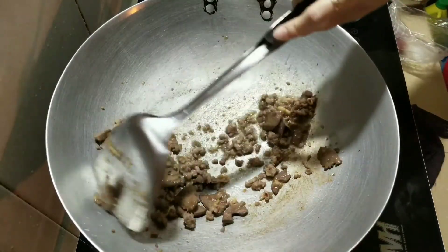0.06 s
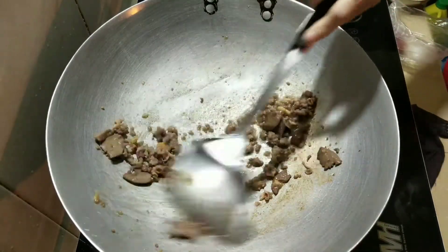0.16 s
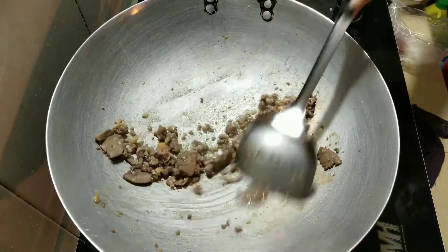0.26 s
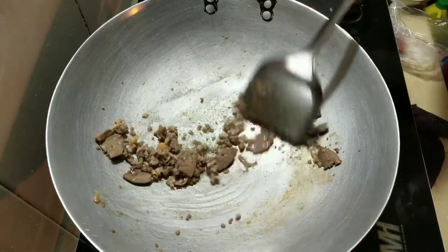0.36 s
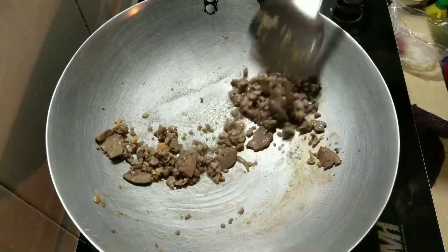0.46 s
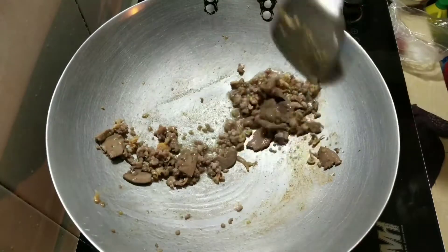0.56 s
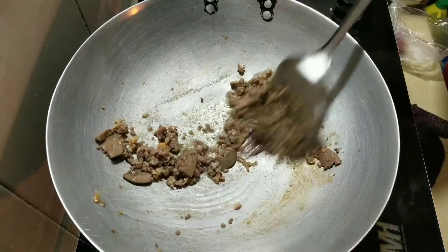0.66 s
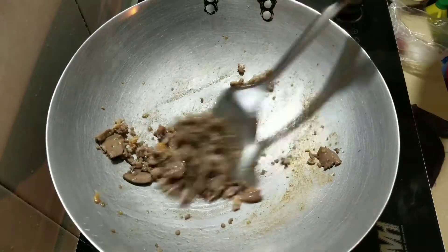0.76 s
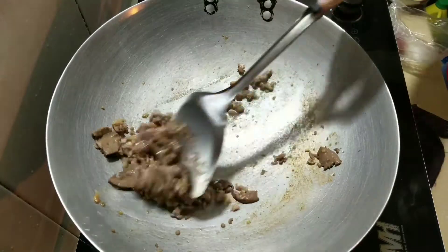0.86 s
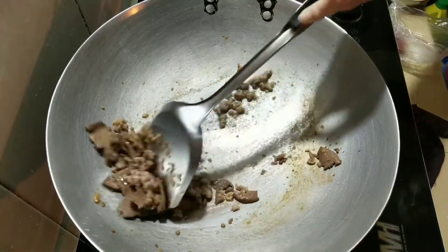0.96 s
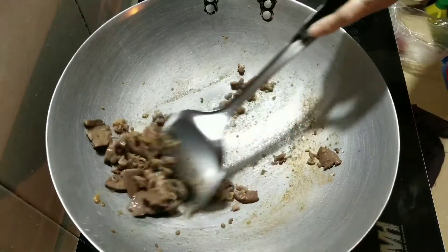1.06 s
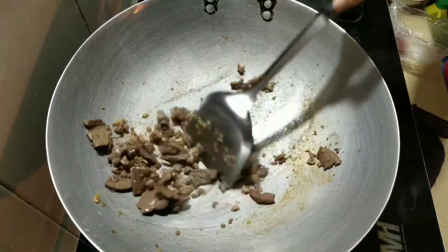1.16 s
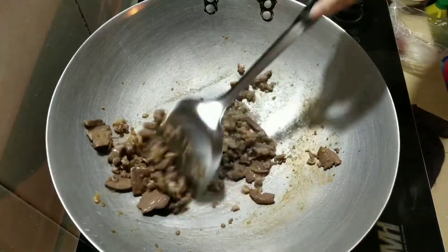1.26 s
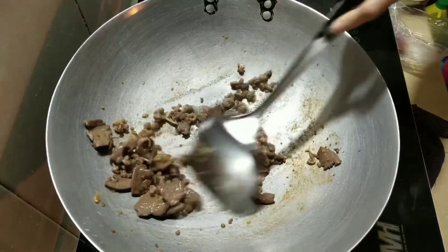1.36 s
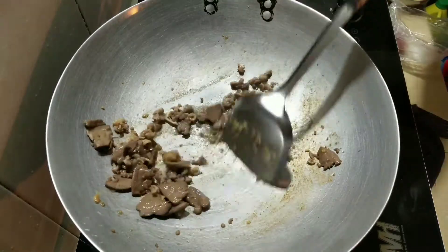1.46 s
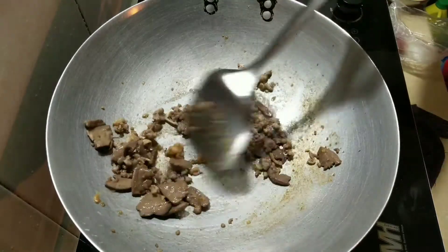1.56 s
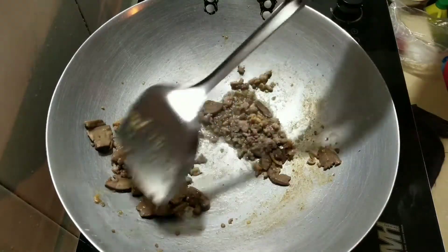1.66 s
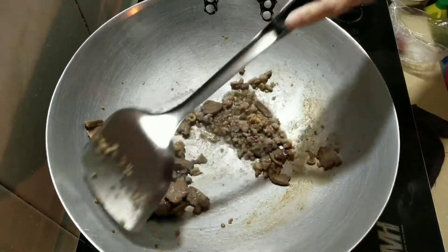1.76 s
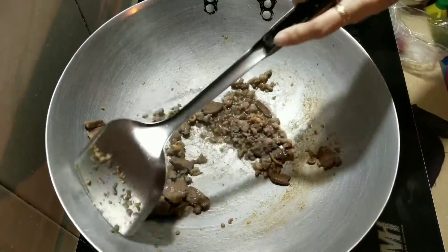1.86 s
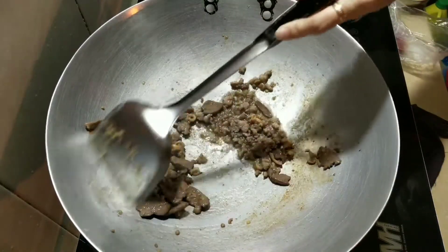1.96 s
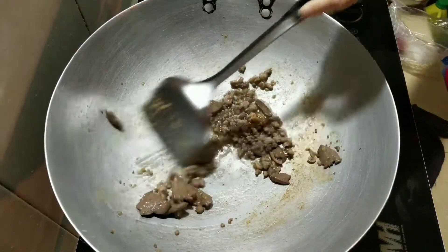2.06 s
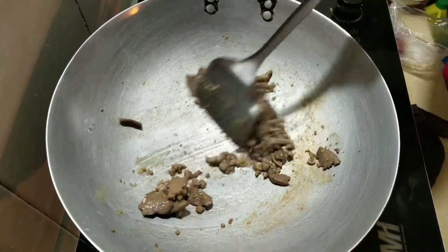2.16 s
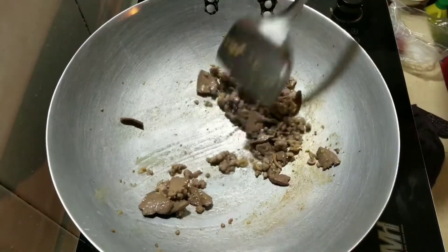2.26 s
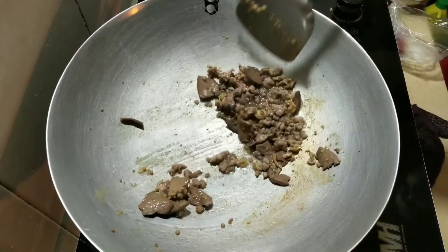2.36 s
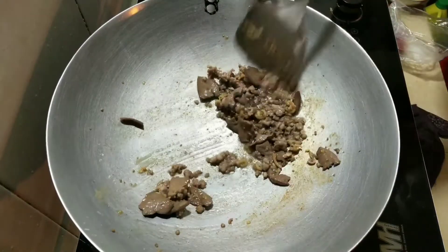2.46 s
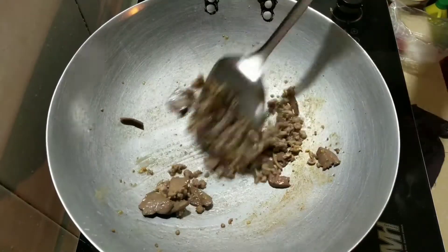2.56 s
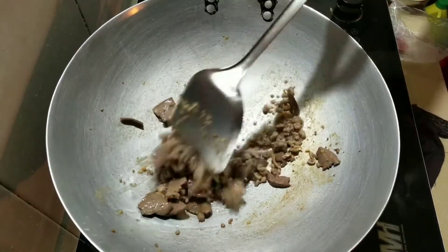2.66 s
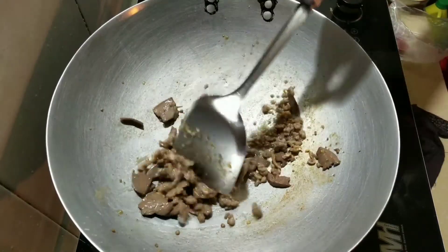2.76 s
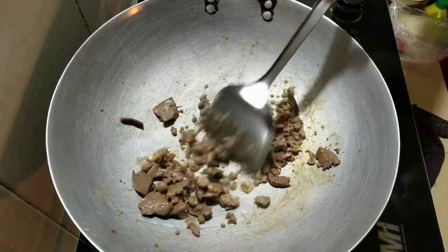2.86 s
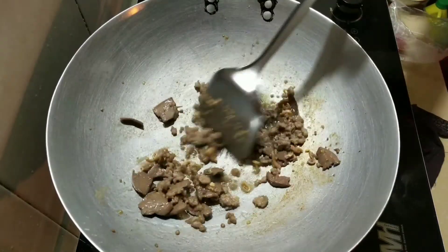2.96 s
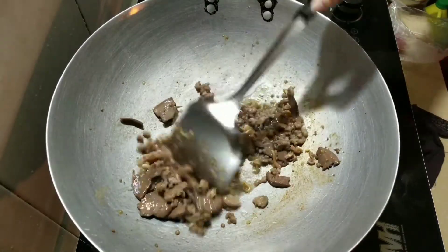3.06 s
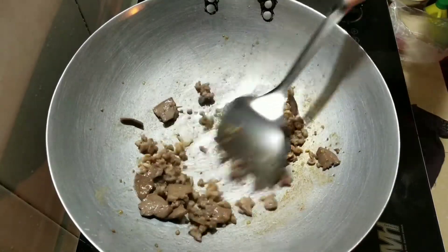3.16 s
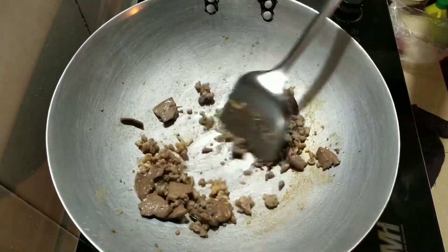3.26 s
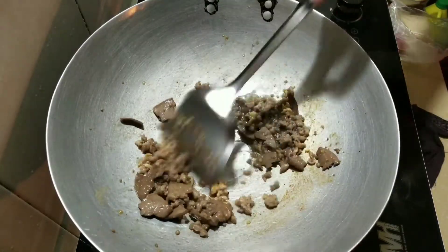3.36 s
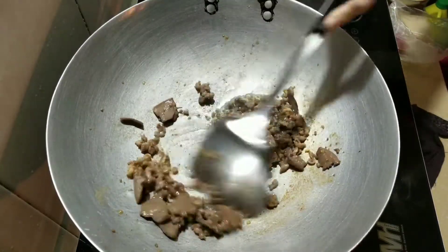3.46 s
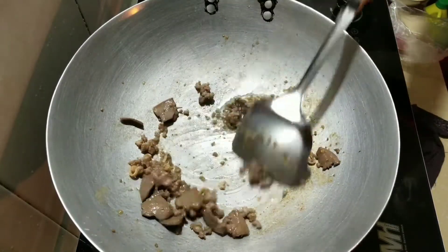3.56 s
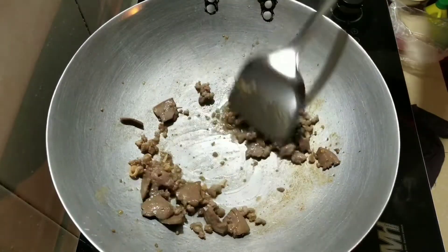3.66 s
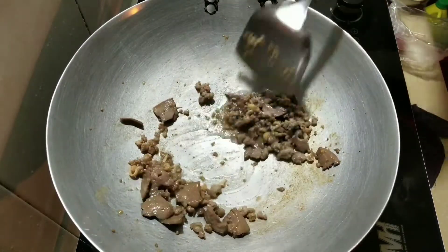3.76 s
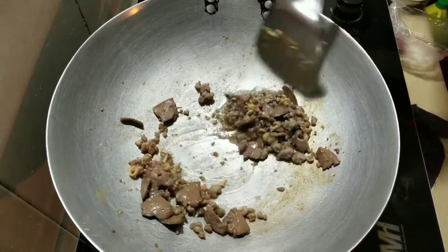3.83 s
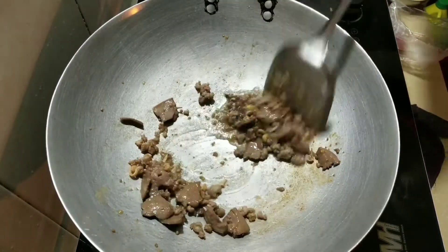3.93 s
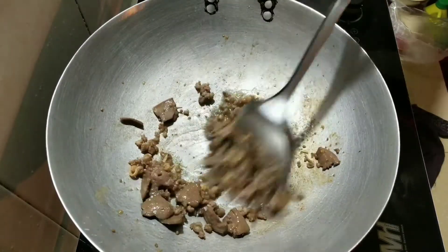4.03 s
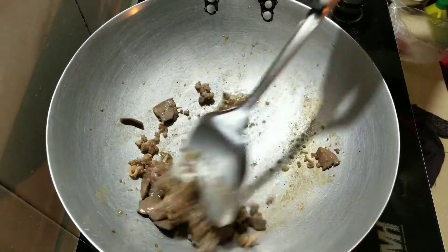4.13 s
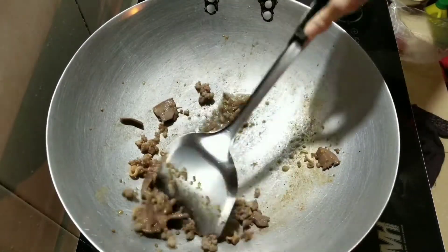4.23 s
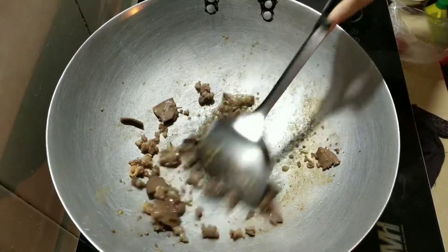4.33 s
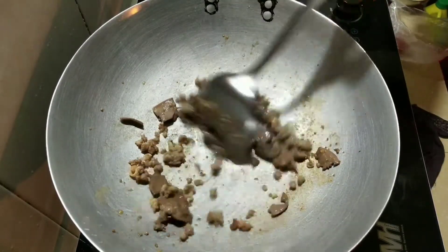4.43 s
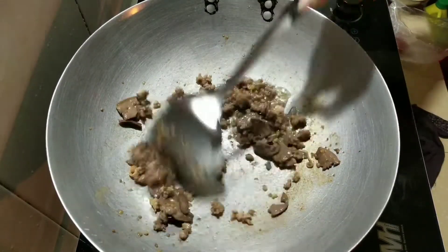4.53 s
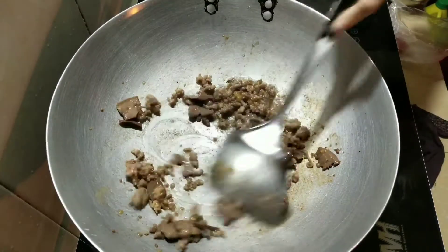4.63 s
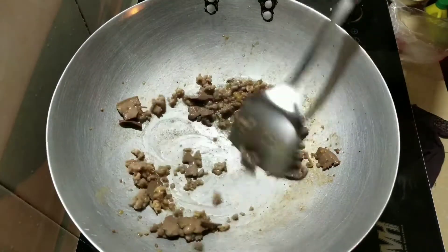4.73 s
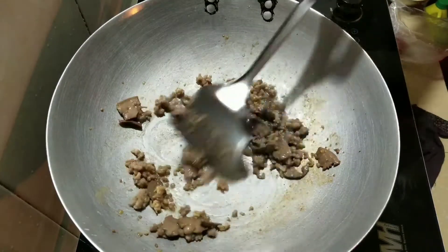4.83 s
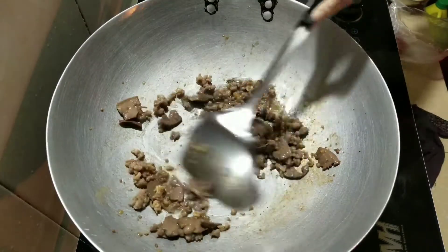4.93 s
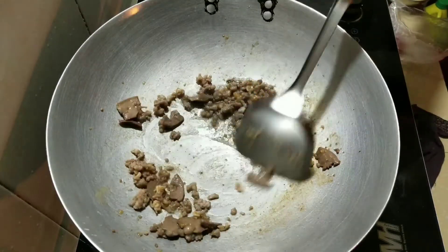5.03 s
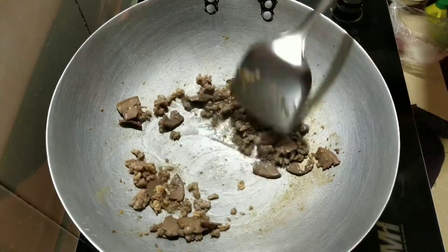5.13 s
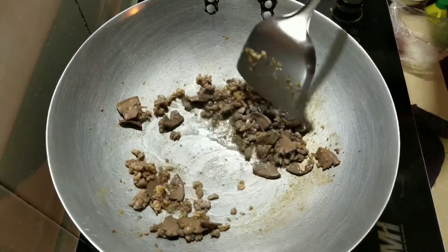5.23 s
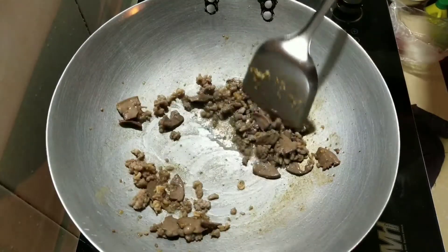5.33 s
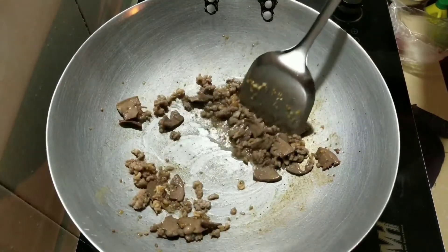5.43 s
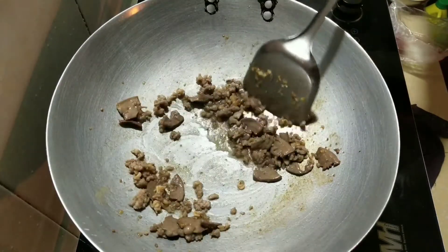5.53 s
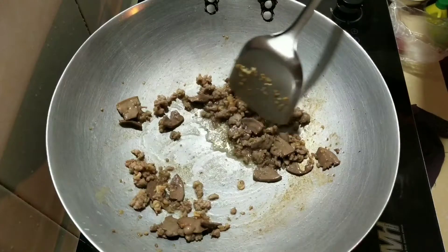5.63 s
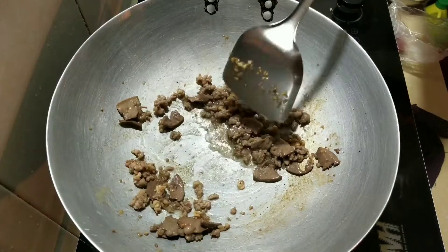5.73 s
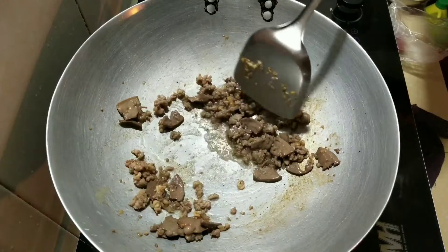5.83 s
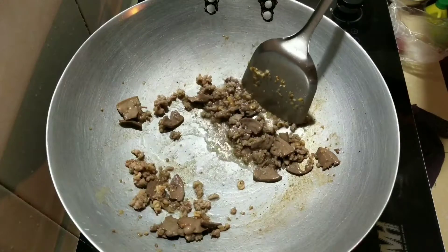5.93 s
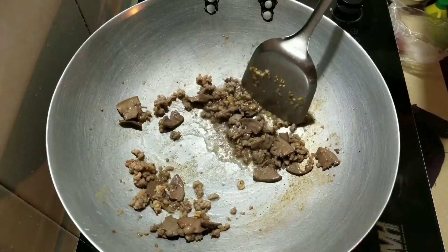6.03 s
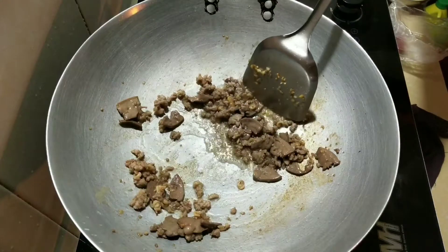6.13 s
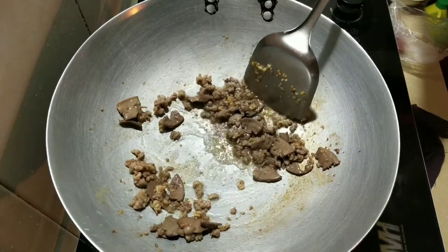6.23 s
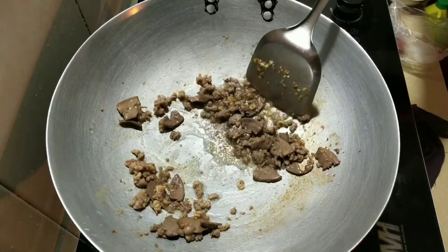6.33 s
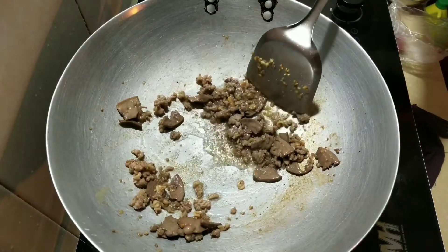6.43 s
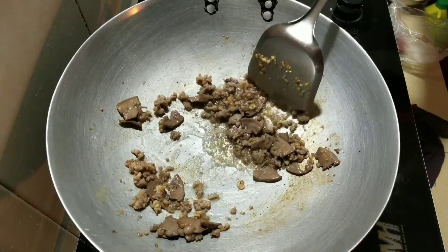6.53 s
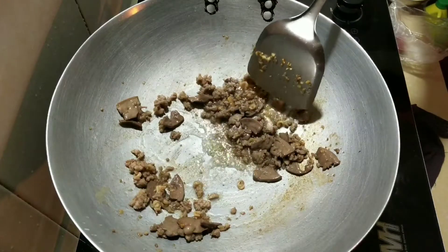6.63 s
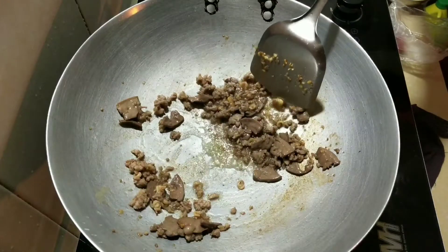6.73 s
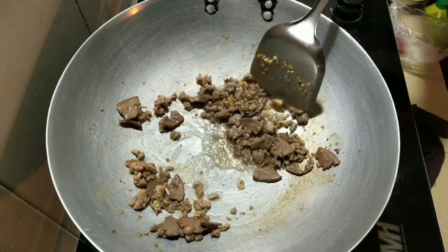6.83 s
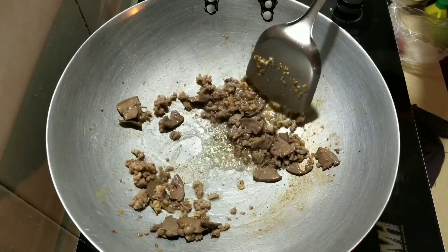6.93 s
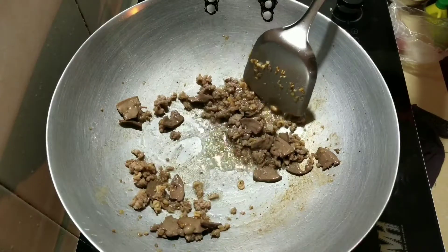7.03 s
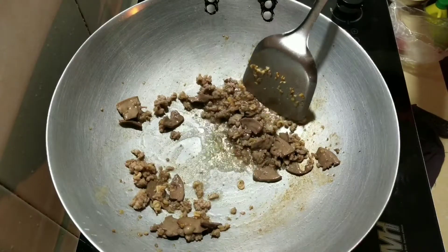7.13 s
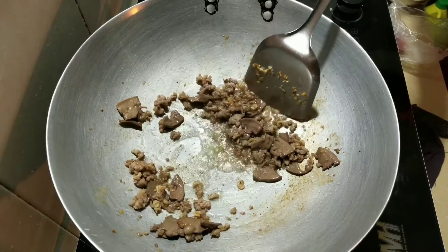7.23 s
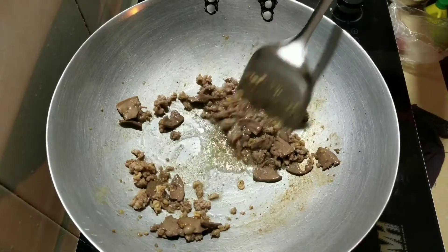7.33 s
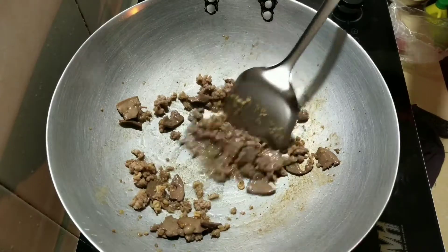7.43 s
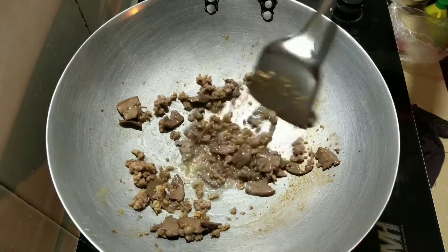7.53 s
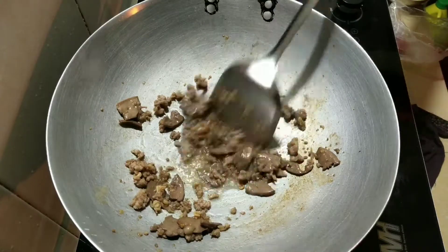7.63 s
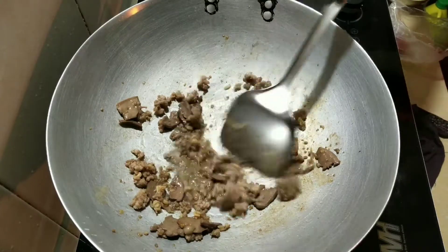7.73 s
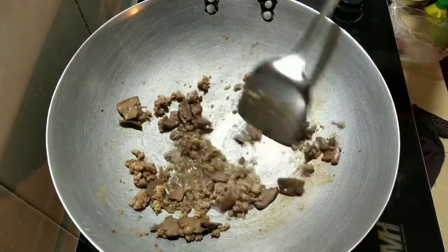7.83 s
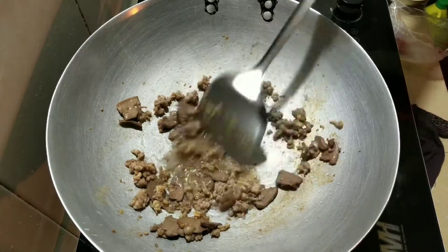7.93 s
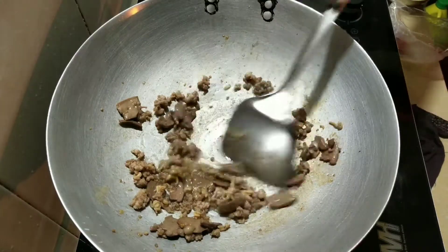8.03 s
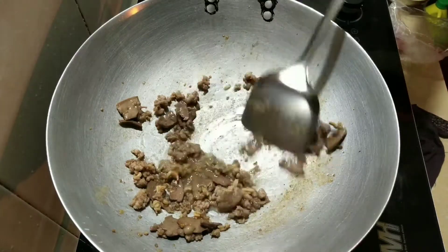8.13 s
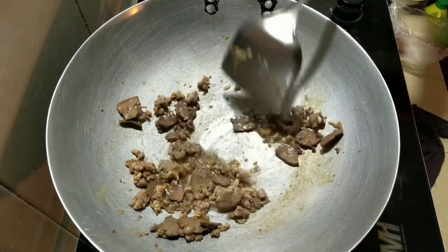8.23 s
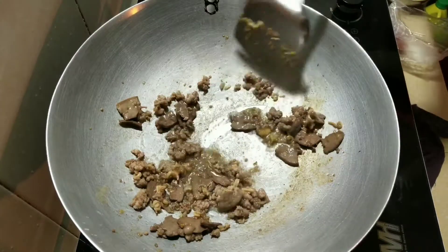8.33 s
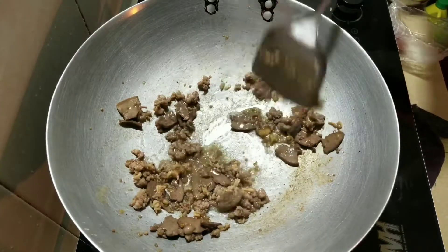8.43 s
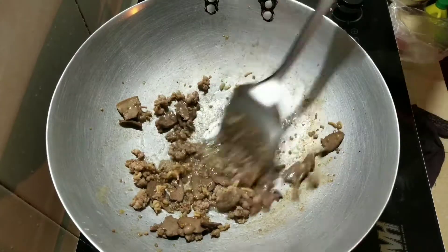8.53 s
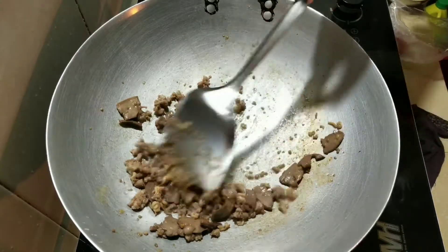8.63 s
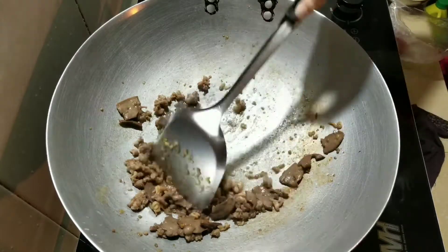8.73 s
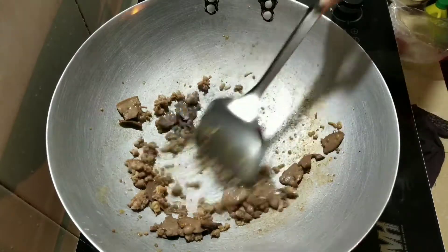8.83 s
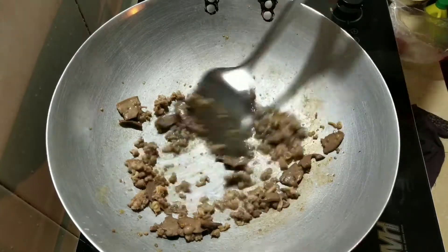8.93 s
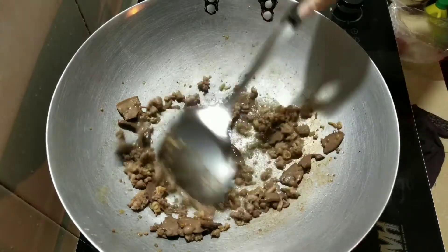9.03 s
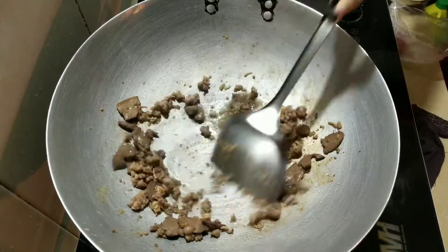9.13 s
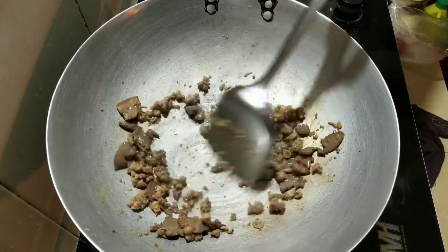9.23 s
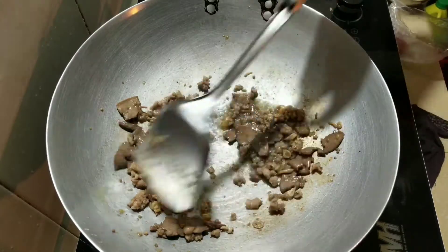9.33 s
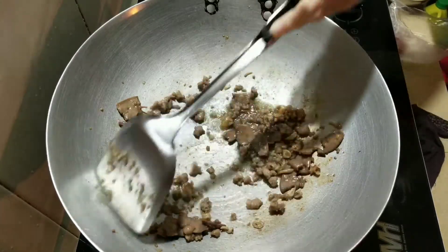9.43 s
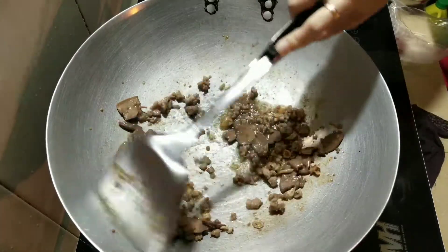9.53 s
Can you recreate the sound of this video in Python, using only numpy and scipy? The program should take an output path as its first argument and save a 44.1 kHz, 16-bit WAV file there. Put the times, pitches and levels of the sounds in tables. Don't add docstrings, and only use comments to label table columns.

```python
import sys
import numpy as np
from scipy import signal
from scipy.io import wavfile
from scipy.ndimage import uniform_filter1d

SR = 44100
rng = np.random.default_rng(int(sys.argv[2]) if len(sys.argv) > 2 else 0)


def amp(db):
    return 10 ** (np.asarray(db, float) / 20)


def write(x):
    x = np.atleast_2d(x).T
    wavfile.write(sys.argv[1], SR, np.round(np.clip(x, -1, 1) * 32767).astype(np.int16))


N = 422919

# pitch_hz [Hz], level_db [dB], t60_s [s]
BOWL_MODES = [(136, 6, 0.048), (170, -12, 0.9), (217, 2, 0.45), (252, 0, 0.5), (280, 4, 0.25),
              (341, 2, 0.3), (358.8, -5, 0.4), (403, 0.5, 0.41), (445, 1, 0.15), (466, -5.5, 0.18),
              (556.4, 1.1, 0.22), (603.5, -10.5, 0.35), (655, -3.5, 0.22), (804, -5, 0.25)]
# peak_s [s], rise_s [s], fall_s [s], lift_db [dB]
FRYING_FLARES = [(.36, 0.2, 0.12, 6.5), (.62, 0.076, 0.19, 7.5), (.78, 0.095, .13, 10),
                 (1.19, .1, 0.39, 6.5), (1.5, 0.095, .14, 6), (2.07, 0.06, 0.8, 6.5),
                 (2.56, 0.12, 0.45, 6.5), (2.94, 0.11, 0.33, 5), (3.22, 0.095, 0.17, 4),
                 (3.57, 0.063, 0.29, 3), (4.02, 0.074, 0.54, 6.5), (4.42, 0.087, 0.21, 9.5),
                 (4.74, 0.13, 0.18, 5), (5.1, 0.11, .08, 2.5), (7.48, 0.18, 0.17, 3.5),
                 (7.78, 0.18, 0.4, 4), (8.14, .15, .2, 4), (8.58, 0.13, 0.14, 6), (8.98, 0.16, 0.19, 6),
                 (9.2, 0.07, 0.18, 4.5)]


def evened(x):
    return x / np.sqrt(np.mean(x ** 2) + 1e-20)


def read(points, hz):
    f, value = np.transpose(points)
    return np.interp(np.log(hz + 1), np.log(f + 1), value)


def add(mix, s, sound):
    part = mix[:, round(s * SR):][:, :sound.shape[1]]
    part += sound[:, :part.shape[1]]


def resonate(x, hz, width_hz):
    r = np.exp(-np.pi * width_hz / SR)
    angle = 2 * np.pi * hz / SR
    return signal.lfilter([1 - r], [1, -2 * r * np.cos(angle), r * r], x) * 2 * np.sin(angle)


def glide(x, hz, width_hz):
    carrier = np.exp(2j * np.pi * np.cumsum(hz) / SR)
    r = np.exp(-np.pi * width_hz / SR)
    smooth = signal.lfilter([1], [1, -2 * r, r * r], x / carrier)
    return (carrier * smooth).real


def nearness_db(hz, centre_hz, fall_db):
    return -fall_db * np.abs(np.log2(hz / centre_hz))


def ring(modes, weight_db, length, rise_s, luck, spread=0.004, uneven_db=2.5):
    hz, db, t60 = np.transpose(modes)[:, :, None]
    strength, detune, phase = luck[:len(hz)].T[:, :, None]
    t = np.arange(SR // 2) / SR
    size = amp(db + weight_db + uneven_db * strength - 60 * t / (t60 * length))
    skew = np.minimum(hz / 1600, 3) * phase
    angle = 2 * np.pi * hz * (1 + spread * detune) * t
    both = np.array([(size * np.sin(angle + side * skew)).sum(0) for side in (-.5, .5)])
    both *= 1 - np.exp(-t / rise_s)
    return both / np.abs(both).max()


def knocks():
    # start_s [s], level_db [dB peak], pitch_hz [Hz, struck spot],
    # rim_db [dB re peak], blade_db [dB re peak]
    muffled = [(.138, -8.5, 320, -51, -24), (.645, -16.5, 413, -8, 10.5), (.654, -8, 285, -17, -17),
               (1.096, -2.5, 444, -19.5, -9.5), (1.138, -18, 430, -17.5, -10),
               (1.167, -17.5, 400, -16, -12), (1.906, -7.5, 544, -5, -10), (1.975, -7.5, 310, -17, -14),
               (2.009, -7.5, 480, -8, -8), (2.044, -15, 520, -2, -4), (2.187, -1, 370, -18, -6),
               (2.4624, -12.5, 297, -3, 7.5), (2.469, -17, 300, -2, 13), (2.487, -13, 370, -12, -2),
               (3.917, -11.5, 523, -18, 4.5), (3.922, -11.5, 248, -12, -4), (3.942, -11, 345, -25, -16),
               (8.465, -8.5, 510, -10, 5), (8.479, -12, 283, -46.5, -30), (8.997, -5.5, 490, -21, -12),
               (9.536, -3, 540, -13, -6)]
    clangs = [
        (.570, -20, 297, 9, 12.5),
        (2.223, -15, 298, -18, -28),
        (2.507, -13.5, 310, -11, -13),
        (3.911, -13, 415, -6, 11),
        (3.959, -12, 370, -19, -22),
    ]
    # pitch_hz [Hz], level_db [dB], t60_s [s]
    rim_modes = [(802, -19, 0.25), (972, 0, 0.32), (1083, -1, 0.27), (1211, -3, 0.25), (1283, -2, 0.2),
                 (1455, -9, 0.2), (1740, -7, 0.19), (2005, -9, 0.15)]
    # pitch_hz [Hz], level_db [dB], t60_s [s]
    blade_modes = [(2300, -3, 0.4), (2643, -4, 0.3), (2805, -6, 0.2), (3700, 0, 0.3), (4035, 1, .6),
                   (4520, 0, 0.34), (5300, -4, 0.2), (5868, 5, 0.2), (6610, 10.5, 0.13), (6860, 4, 0.1),
                   (7117, 6, 0.12), (7400, 4, 0.15), (7700, 7, 0.04)]
    out, t = np.zeros((2, N)), np.arange(SR // 2) / SR
    bowl_hz = np.array(BOWL_MODES)[:, :1]
    bright = signal.butter(1, [900, 14000], "bandpass", fs=SR)
    blows = sorted([row + (0.4,) for row in muffled] + [row + (1,) for row in clangs])
    lucks = rng.standard_normal((len(blows), 3, 14, 3))
    for (s, db, hz, rim_db, blade_db, length), (bowl_luck, rim_luck, blade_luck) in zip(blows, lucks):
        bowl_rise_s = 0.00087 * np.clip(-rim_db / 22, 1, 3)
        bowl = ring(BOWL_MODES, nearness_db(bowl_hz, hz, 15.7), 0.67, bowl_rise_s, bowl_luck)
        bowl = bowl * (0.49 + 0.8 * np.exp(-t / 0.019))
        bowl = signal.lfilter(*signal.butter(2, 0.54 * hz, "highpass", fs=SR), bowl)

        chatter = amp(3.9 * evened(uniform_filter1d(rng.standard_normal(len(t)), 90)))
        chatter = np.maximum(chatter, 3.6 * np.exp(-t / 0.0063))
        grit = rng.standard_normal((2, len(t))) * chatter
        low_grit, high_grit = resonate(grit, 3540, 2500), resonate(grit, 6540, 1600)
        grit = signal.lfilter(*bright, grit) + amp(17.5) * high_grit + amp(10.5) * low_grit
        two_stages = amp(-17 - 60 * t / (0.13 * length)) + amp(-14.5 - 60 * t / 0.35)
        rattle = evened(grit) * two_stages * (1 - np.exp(-t / 0.0018))
        blade = ring(blade_modes, 0, .5 * length, .0006, blade_luck, spread=.006, uneven_db=3)
        blade = amp(-5) * blade * np.sqrt(chatter) + rattle

        free = np.clip(1.9 + rim_db / 24, .2, 1.1)
        shimmer = resonate(resonate(rng.standard_normal(len(t)), 1220, 820), 1260, 1000)
        rim = ring(rim_modes, 0, length * free, 0.00076, rim_luck)
        rim = rim + amp(-17.5 - 60 * t / 0.35) * evened(shimmer)
        add(out, s + .0008, amp(db) * (bowl + amp(rim_db) * rim + amp(blade_db - 1.5) * blade))
    return out


def pings():
    # start_s [s], level_db [dB peak], pitch_hz [Hz], t60_s [s]
    single_rings = [(.571, -17, 4400, .05), (.572, -24, 4030, .3), (.585, -26, 4480, .2),
                    (.571, -24, 2300, .2), (.571, -14.5, 6500, .07), (0.646, -9, 6550, .035),
                    (.647, -22, 4040, 0.18), (2.463, -12, 3710, 0.06), (2.472, -17, 969, .2),
                    (1.907, -15, 1000, .07), (2.01, -17, 700, .1), (.139, -17, 270, .15),
                    (.139, -27, 560, .15), (2.24, -21, 220, .3), (2.53, -25, 240, .5), (.67, -25, 235, .6),
                    (3.95, -26, 222, .8), (9.537, -20, 1215, .2), (9.537, -18, 800, .2),
                    (9.537, -10, 555, .2), (9.02, -29, 240, .4), (1.097, -11, 345, .17),
                    (2.466, -9, 6840, 0.065), (3.912, -15, 6120, .04), (8.466, -19, 2530, 0.088),
                    (9.538, -9, 7100, .04)]
    out = np.zeros((2, N))
    for (s, db, hz, t60), luck in zip(single_rings, rng.standard_normal((len(single_rings), 3, 3))):
        add(out, s, amp(db) * ring([(hz, 0, t60)] * 3, 0, 0.92, 0.00081, luck, spread=0.012))
    return out


def taps():
    # [Hz, struck spot]
    soft_taps = [(0.226, -23, 347), (0.415, -28.5, 343), (0.481, -36, 355), (0.745, -25, 457),
                 (0.809, -24.5, 356), (1.483, -21, 380), (1.507, -36, 394), (2.396, -30, 350),
                 (2.58, -17.5, 403), (3.192, -33.5, 362), (3.528, -26.5, 383), (3.705, -30, 347),
                 (4.369, -29, 379), (4.66, -20.5, 396), (4.795, -17.5, 440), (4.855, -15.5, 446),
                 (4.909, -15.5, 425), (4.939, -26, 400), (5.044, -22, 380), (5.486, -35, 360),
                 (5.579, -35, 358), (7.369, -25.5, 360), (7.424, -22.5, 412), (7.817, -29, 460),
                 (7.844, -22, 358), (8.065, -35, 365), (8.106, -29, 410), (8.705, -30, 354),
                 (9.172, -28, 396), (9.222, -22.5, 380)]
    out, bowl_hz = np.zeros((2, N)), np.array(BOWL_MODES)[:, :1]
    for (s, db, hz), luck in zip(soft_taps, rng.standard_normal((len(soft_taps), 14, 3))):
        bowl = ring(BOWL_MODES, nearness_db(bowl_hz, hz, 29.0), 0.43, 0.006, luck)
        add(out, s - .003, amp(db - 3.5) * bowl)
    return out


def drone(hz_now, level_db, share, rasp_db=-15):
    size = len(hz_now)
    shape = (len(BOWL_MODES) + 2, size)
    clumps = amp(4.0 * evened(uniform_filter1d(rng.standard_normal(size), 600)))
    slips = rng.standard_normal(shape) * (rng.random(shape) < 900 / SR) * clumps
    hum = np.zeros(size)
    for x, (hz, mode_db, t60) in zip(slips, BOWL_MODES):
        drive = x * amp(mode_db + nearness_db(hz, hz_now, 10 + 22 * share))
        hum += resonate(drive, hz, 2.0 / t60)
    slide = evened(glide(slips[-1], hz_now, 28))
    slide = slide + amp(-18.5) * evened(glide(slips[-2], 1.6 * hz_now, 43))
    rasp = evened(resonate(resonate(slips[:2], 1000, 800), 1200, 900))
    hum = evened(hum) + 2.54 * share * slide
    hum /= np.sqrt(uniform_filter1d(hum ** 2, 3500) + 1e-20)
    return (hum + amp(rasp_db) * rasp) * amp(level_db - 4) * signal.windows.tukey(size, .1)


def strokes():
    # start_s [s], length_s [s], level_db [dB], from_hz [Hz], to_hz [Hz]
    skids = [(0.149, 0.45, -24.5, 336, 392), (.67, 0.29, -19, 427, 423), (1.121, 0.15, -25, 384, 408),
             (1.921, 0.059, -20.5, 542, 545), (2.199, .25, -16, 331, 237), (2.477, 0.42, -20.5, 338, 404),
             (3.928, 0.34, -19, 360, 402), (7.37, .25, -26, 376, 446), (8.057, 0.24, -32.5, 370, 388),
             (8.478, 0.3, -17.5, 339, 280), (8.491, .2, -24, 603, 570), (9.009, .16, -27, 445, 465),
             (9.171, .22, -29, 400, 400)]
    # start_s [s], length_s [s], level_db [dB peak], from_hz [Hz], to_hz [Hz]
    drags = [
        (1.26, .14, -21.5, 390, 425),
        (1.424, 0.12, -29.5, 360, 363),
        (2.01, .09, -15, 432, 514),
        (2.38, 0.063, -39, 330, 386),
        (4.653, .13, -32, 379, 404),
        (4.789, .24, -26.5, 419, 366),
        (5.021, 0.11, -36, 371, 363),
        (7.742, 0.15, -36.5, 382, 312),
    ]
    # start_s [s], length_s [s], level_db [dB], from_hz [Hz], to_hz [Hz]
    pulls = [
        (.585, .07, -27, 440, 445),
        (.72, .13, -26, 445, 480),
        (1.18, .09, -29, 400, 400),
        (1.385, .06, -31, 420, 390),
        (9.17, .16, -31, 410, 400),
        (2.02, .09, -26, 850, 880),
        (2.06, .125, -20, 575, 430),
        (2.55, .07, -23, 420, 405),
        (9.075, .1, -31, 500, 420),
    ]
    out = np.zeros((2, N))
    for s, length, db, from_hz, to_hz in skids:
        t = np.arange(0, length, 1 / SR)
        hz_now = from_hz + (to_hz - from_hz) * t / length
        add(out, s, drone(hz_now, db - 85 * t, 0.24))
    for s, length, db, from_hz, to_hz in drags:
        u = np.arange(0, length, 1 / SR) / length
        effort = np.sin(np.pi * u)
        hz_now = (from_hz + (to_hz - from_hz) * u) * (1 + 0.2495 * effort)
        add(out, s, drone(hz_now, db - 10.5 * (1 - effort), 0.74))
    for s, length, db, from_hz, to_hz in pulls:
        u = np.arange(0, length, 1 / SR) / length
        add(out, s, drone(from_hz + (to_hz - from_hz) * u, db - 4 * u, .6, rasp_db=-9))
    return out


def flare_db(t, events):
    return sum(np.interp(t, [s - rise, s, s + fall], [0, db, 0]) for s, rise, fall, db in events)


def frying():
    # pitch_hz [Hz], level_db [dB per Hz]
    fizz_curve = [(120, -8.5), (190, -2.5), (260, -7.5), (600, -9), (1000, -6.5), (1400, -4.5),
                  (2450, 0.05), (3500, -3), (4900, -5.5), (6800, -0.46), (8300, -5.5), (9700, -10.5),
                  (13300, -13), (15300, -8)]
    # pitch_hz [Hz], coherence [-1 to 1]
    likeness = [(60, 1), (180, 1), (550, 0.75), (1650, 0.47), (4970, 0.0064), (15000, 0.013)]
    # [dB, left over right]
    balance = [(60, -0.5), (180, -2), (550, -2), (1650, -1), (4970, -0.5), (15000, 0.5)]
    # time_s [s], level_db [dB]
    simmer = [(0, -33), (.55, -33), (.9, -37.5), (1.9, -35.5), (2.8, -36.5), (3.5, -32.5), (4.2, -38.5),
              (4.6, -36.5), (5.0, -34), (6.0, -34), (7.2, -34), (9.59, -34.5)]
    # peak_s [s], rise_s [s], fall_s [s], lift_db [dB]
    seethes = [(.33, .1, .1, 0), (.8, 0.07, .05, 1.5), (1.5, .06, .08, 1), (2.9, 0.037, .06, 3),
               (3.2, 0.028, .06, 1.5), (4.08, .04, .06, 3), (5.89, .04, 0.064, 2), (6.13, .06, 0.065, 1.5),
               (6.88, .03, .05, 2), (7.44, .03, .06, 5.5), (8.17, .03, .04, 5), (8.95, 0.047, .05, 3),
               (9.25, 0.042, .05, 2.5)]
    size = amp(2.3 * np.minimum(rng.exponential(1, (2, N)), 6))
    bursts = rng.random((2, N)) < 5000 / SR
    pops = rng.standard_normal((2, N)) * (size * bursts + 0.94)
    hz, t, z = signal.stft(pops, SR, nperseg=512, noverlap=384)
    patches = rng.standard_normal(z.shape[1:])
    patches = evened(uniform_filter1d(uniform_filter1d(patches, 8, 0), 18, 1))
    flecks = evened(uniform_filter1d(rng.standard_normal(z.shape[1:]), 9, 1))
    large = 1 / (1 + (hz[:, None] / 2200) ** 3)
    field_db = read(fizz_curve, hz)[:, None] + 1.2 * patches + 1.8 * flecks
    field_db = field_db + large * (-3 + flare_db(t, seethes))
    same = np.clip(read(likeness, hz), -1, 1)[:, None]
    z = np.array([z[0], same * z[0] + np.sqrt(1 - same ** 2) * z[1]]) * amp(field_db)
    z *= amp(np.array([.5, -.5])[:, None, None] * read(balance, hz)[:, None])
    fizz = evened(signal.istft(z, SR, nperseg=512, noverlap=384)[1][:, :N])
    now = np.arange(N) / SR
    return fizz * amp(np.interp(now, *np.transpose(simmer)) + flare_db(now, FRYING_FLARES) + 3.5)


def spits():
    # [dB, left over right]
    fat_spits = [(2.9228, -17, 0.0), (3.5280, -18, 0.0), (4.0153, -12, 2), (5.8994, -22, -1.0),
                 (6.3596, -19.5, -0.5), (6.4994, -23, 0.0), (6.8768, -19.5, 0.0), (7.2275, -21, 0.0),
                 (7.3292, -19.5, -1.5), (8.0474, -16, 3.5), (8.1754, -15, -0.5)]
    out, t = np.zeros((2, N)), np.arange(400) / SR
    for (s, db, lean_db), burst in zip(fat_spits, rng.standard_normal((len(fat_spits), 2, len(t)))):
        crack = np.diff(burst[0] + .6 * burst, prepend=0) * amp(-60 * t / 0.035)
        pop = resonate(crack, 2600, 3500)
        add(out, s, amp(db + np.array([[.5], [-.5]]) * lean_db) * pop / np.abs(pop).max())
    return out


def bubbles():
    # pitch_hz [Hz], width_hz [Hz]
    bubble_modes = [(1900, 380), (2300, 250), (2600, 400), (3000, 420), (6500, 700), (7200, 620)]
    out = np.zeros((2, N))
    for hz, width_hz in bubble_modes:
        size = amp(4. * np.minimum(rng.exponential(1, N), 4))
        bursts = (rng.random(N) < 25 / SR) * size
        side = rng.uniform(0, np.pi / 2, N)
        placed = bursts * np.array([np.cos(side), np.sin(side)])
        out += resonate(placed, hz, width_hz) * SR / (2 * np.pi * width_hz)
    return out * amp(-41 + .7 * flare_db(np.arange(N) / SR, FRYING_FLARES))


def burner():
    # pitch_hz [Hz], width_hz [Hz], level_db [dB]
    cavity = [(91.8, 7, -2), (118.4, 11.4, 2), (146, 23, 2), (169.3, 7.5, -2), (358, 9.4, -5)]
    gusts = amp(1.3 * evened(uniform_filter1d(rng.standard_normal(N), 2500)))
    air = rng.standard_normal((3, N)) * gusts
    roar = np.zeros((3, N))
    for hz, width_hz, db in cavity:
        roar += amp(db) * evened(resonate(resonate(air, hz, 0.91 * width_hz), hz, 0.91 * width_hz))
    return amp(-49.5) * evened(roar[0] + 0.14 * roar[1:])


def jolts():
    # start_s [s], level_db [dB peak]
    pushes = [
        (.654, -43),
        (1.098, -50),
        (1.978, -44),
        (2.189, -42),
        (2.466, -27),
        (3.914, -49),
        (9.538, -40),
    ]
    pitch_hz, t60_s = 54, 0.039
    out, t = np.zeros((2, N)), np.arange(SR // 5) / SR
    for s, db in pushes:
        decay = amp(db - 60 * t / t60_s + np.array([[-4.], [4.]]))
        add(out, s, decay * np.sin(2 * np.pi * pitch_hz * t) * 3)
    return out


def kitchen(x):
    t = np.arange(SR // 3) / SR
    signs = rng.choice([-1., 1.], (2, len(t)))
    sparse = rng.random((2, len(t))) < 2000 / SR
    tail = signs * sparse * amp(-60 * t / 0.56) * (t > .003)
    shared = tail.mean(0)
    tail = shared + signal.lfilter(*signal.butter(2, 300, "highpass", fs=SR), tail - shared)
    return signal.fftconvolve(x, tail / np.linalg.norm(tail[0]), axes=1)[:, :N]


def scene():
    pan = (knocks() + pings() + taps() + strokes()) * amp(np.array([[-1.2], [1.2]]))
    return pan + amp(-15.5) * kitchen(pan) + frying() + spits() + burner() + jolts() + bubbles()


def low_pass(x):
    return signal.sosfilt(signal.butter(12, 16820, fs=SR, output="sos"), x)


def record(dry):
    cut = signal.lfilter(*signal.butter(4, 66, "highpass", fs=SR), dry)
    rumble = evened(resonate(resonate(rng.standard_normal(dry.shape), 55, 76), 55, 76))
    rumble = rumble * amp(-76 + np.array([[2.5], [-2.5]]))
    held = .95 * np.tanh((cut + rumble) / .95)
    edge = signal.firwin(511, 15750, window=("kaiser", 5), fs=SR)
    limited = signal.oaconvolve(held, edge[None], "same")
    return low_pass(limited)


dry = scene()
out = record(dry)
write(out)
```